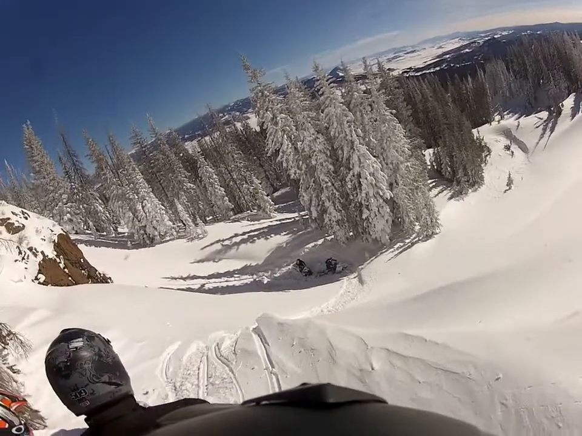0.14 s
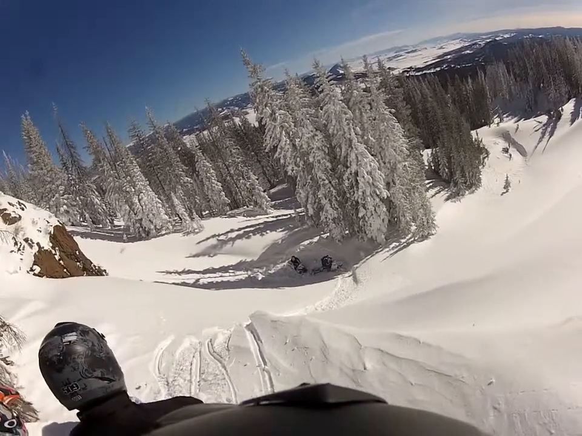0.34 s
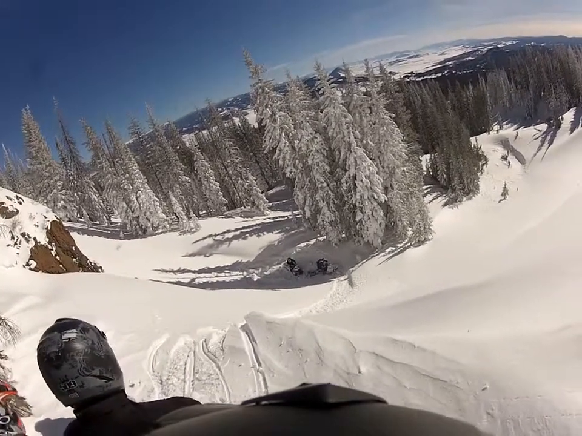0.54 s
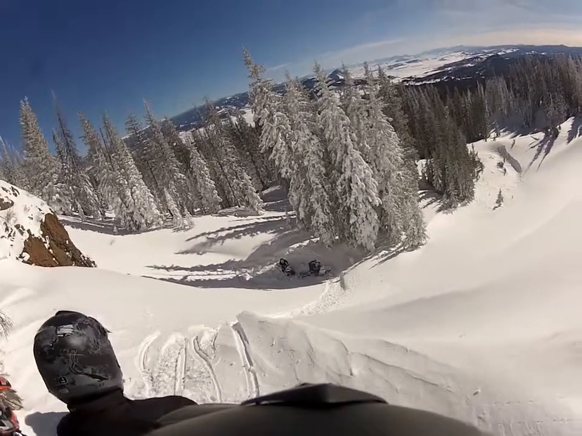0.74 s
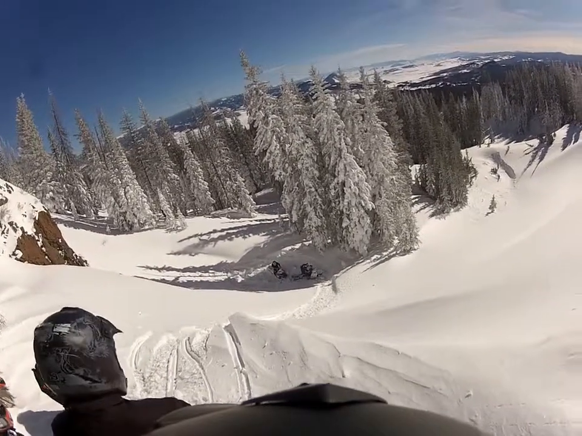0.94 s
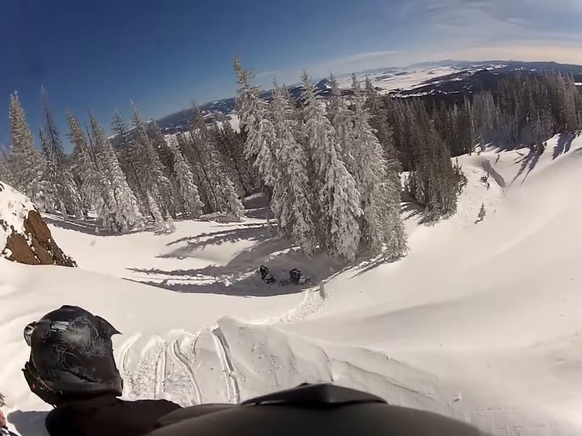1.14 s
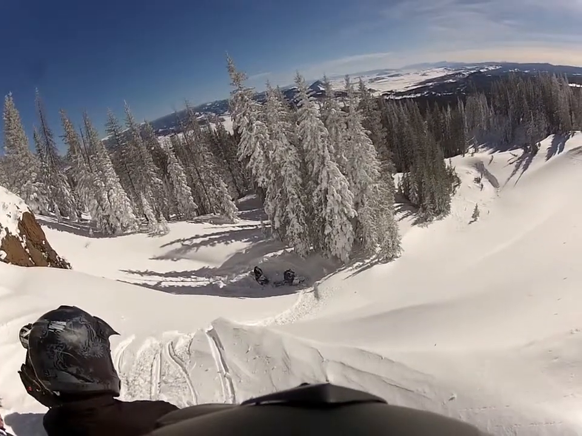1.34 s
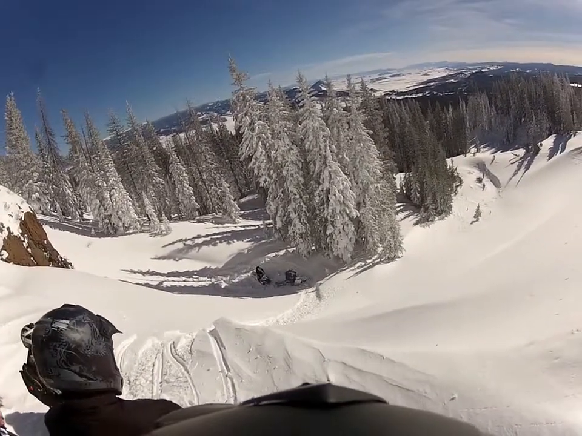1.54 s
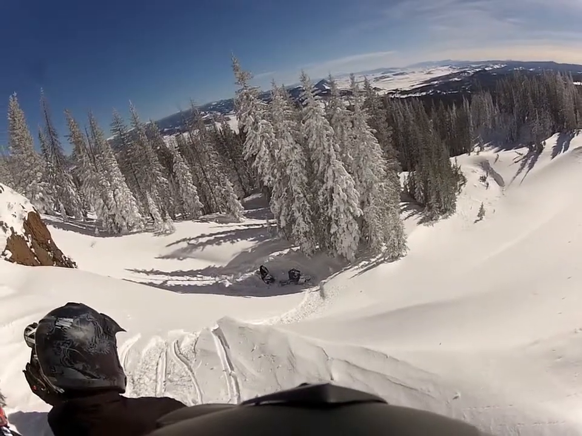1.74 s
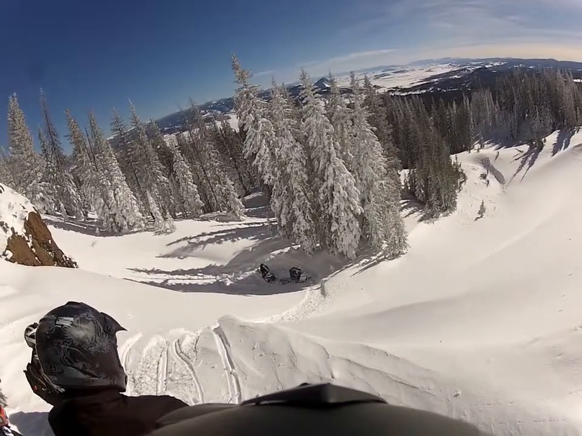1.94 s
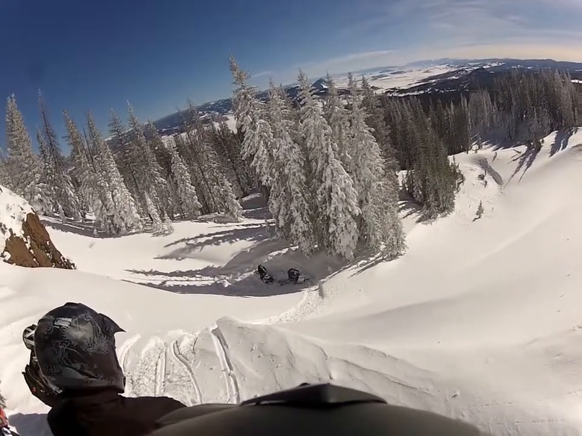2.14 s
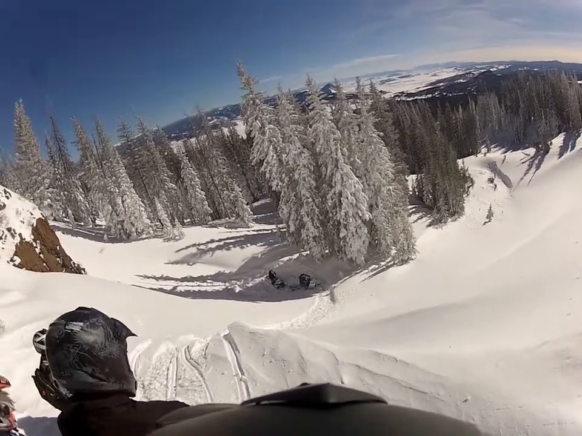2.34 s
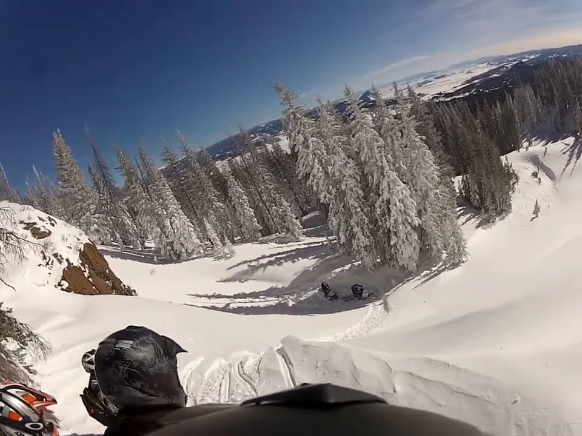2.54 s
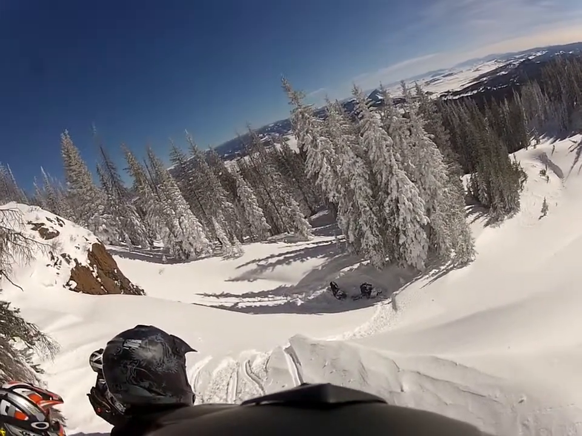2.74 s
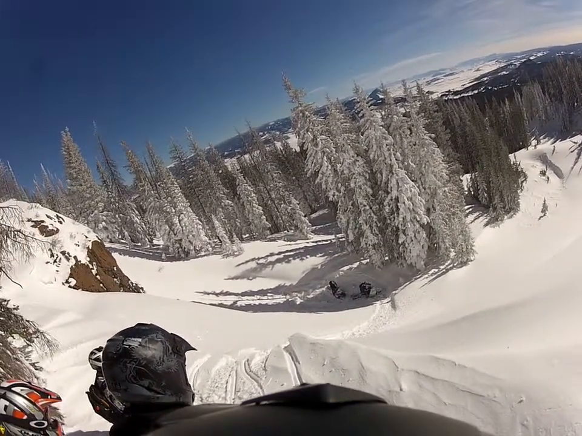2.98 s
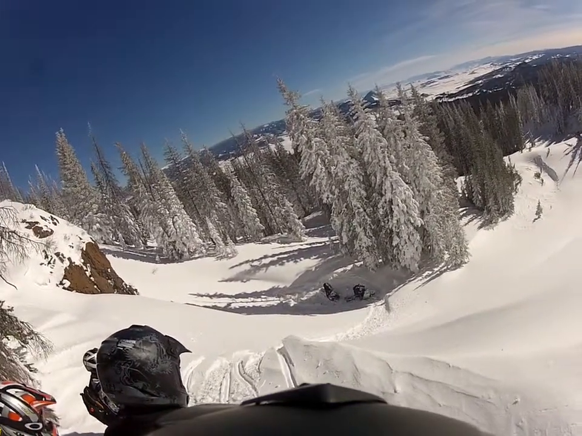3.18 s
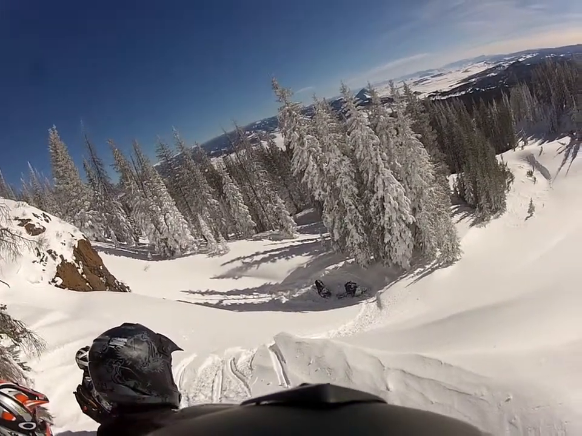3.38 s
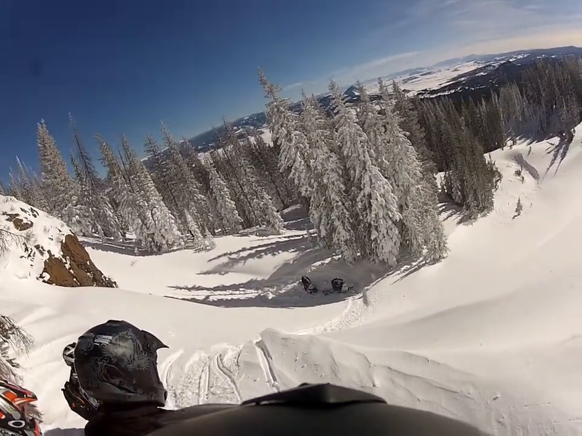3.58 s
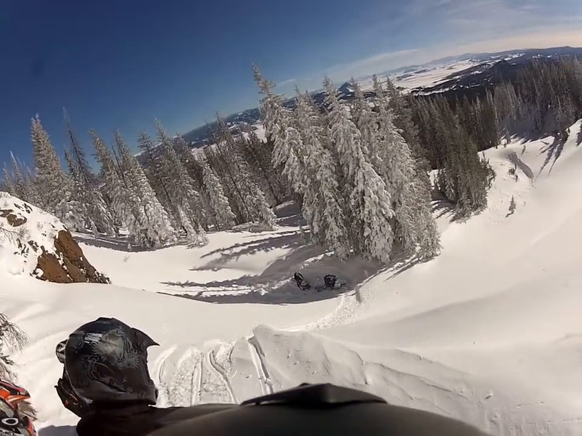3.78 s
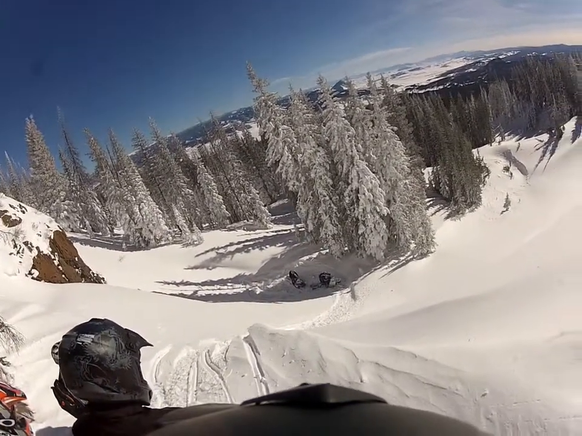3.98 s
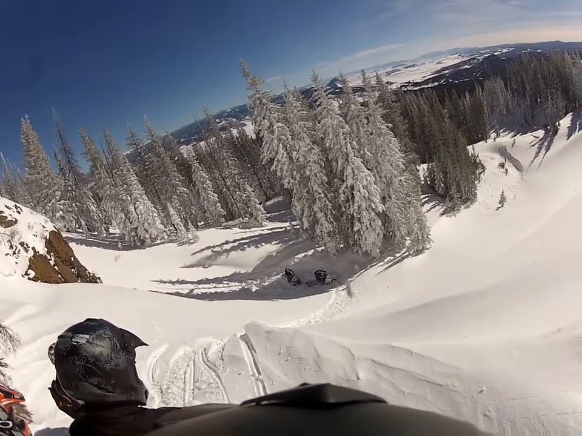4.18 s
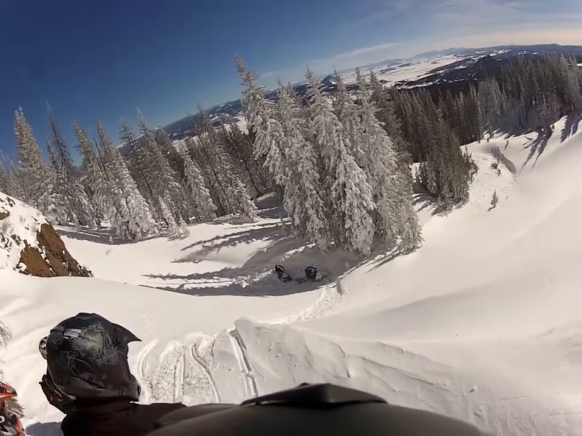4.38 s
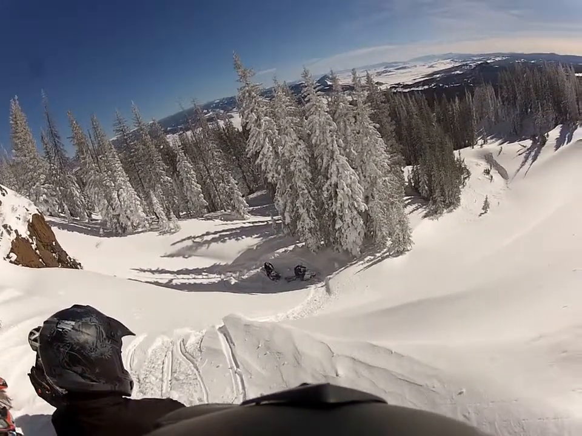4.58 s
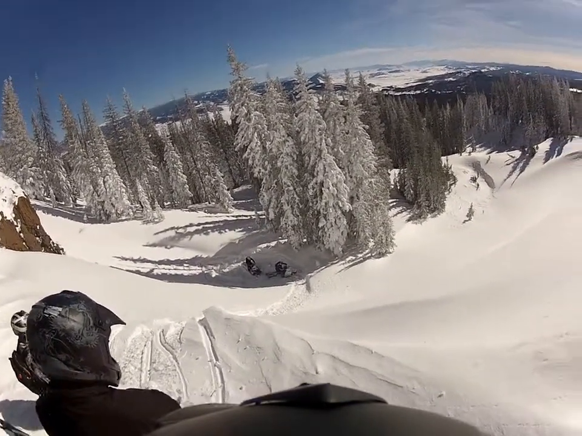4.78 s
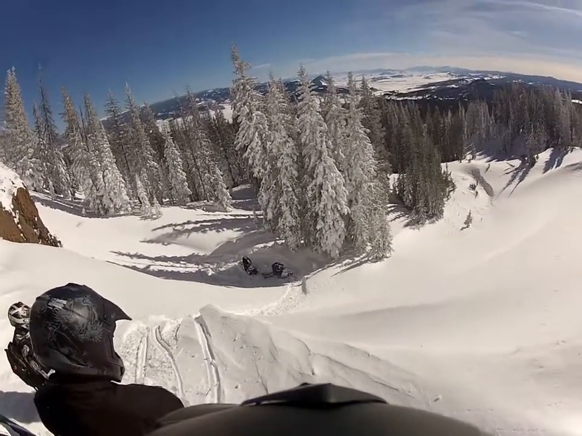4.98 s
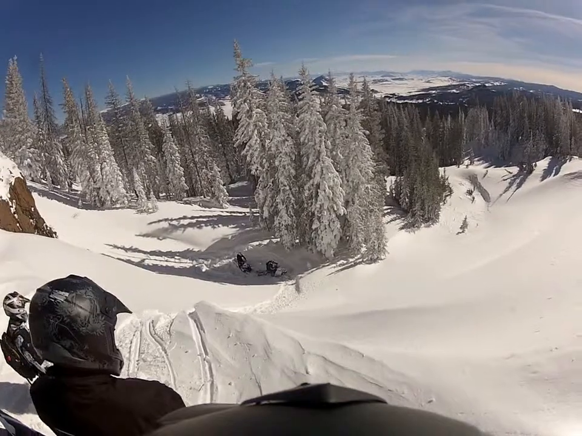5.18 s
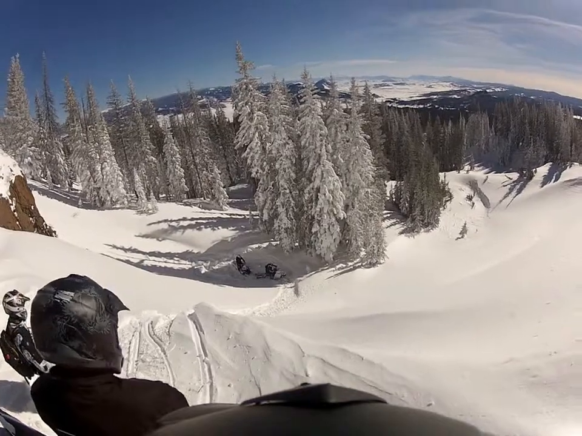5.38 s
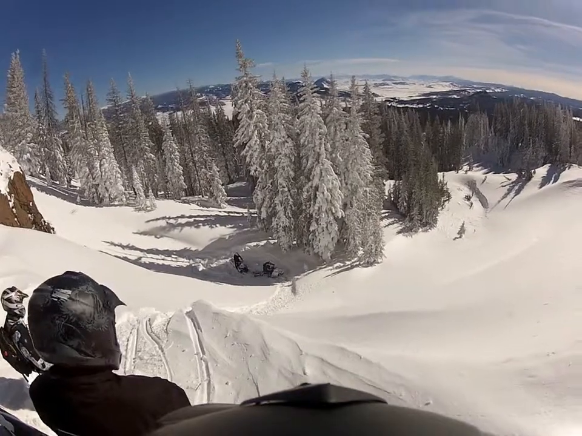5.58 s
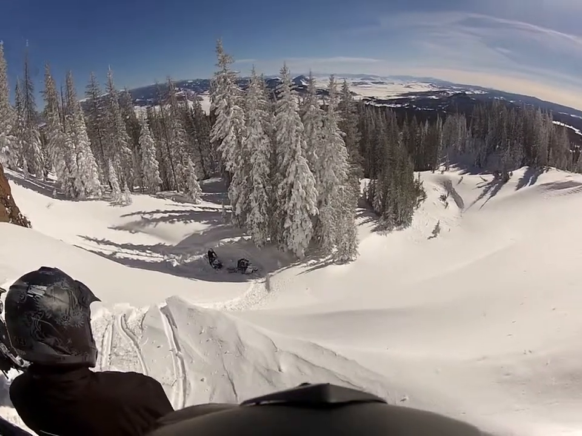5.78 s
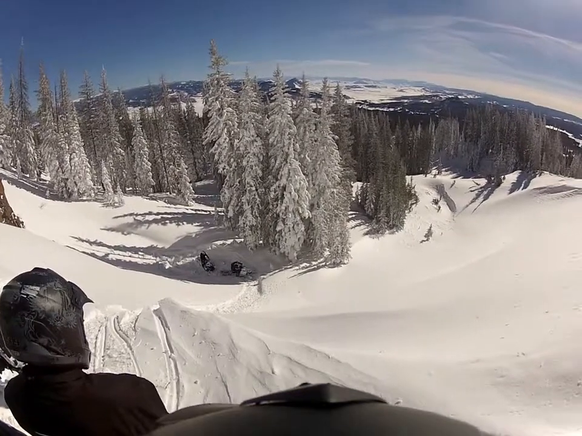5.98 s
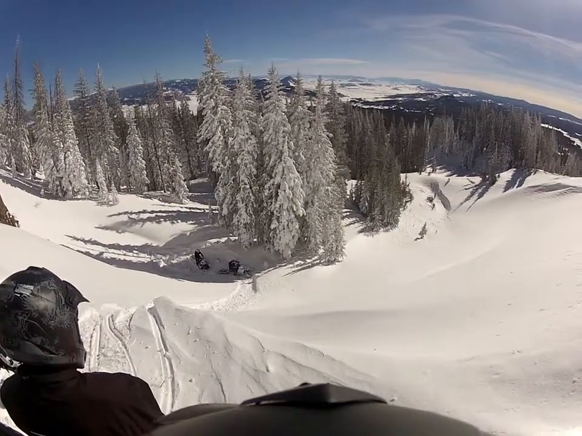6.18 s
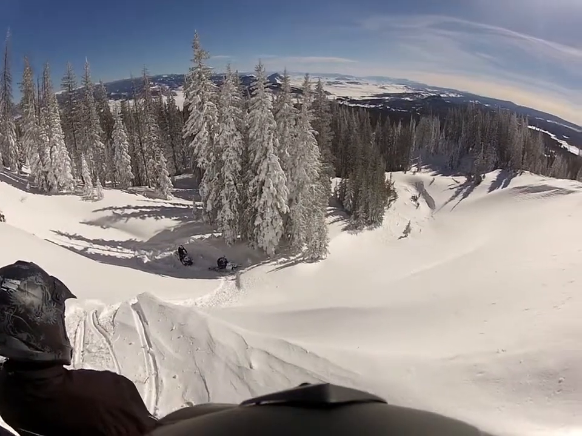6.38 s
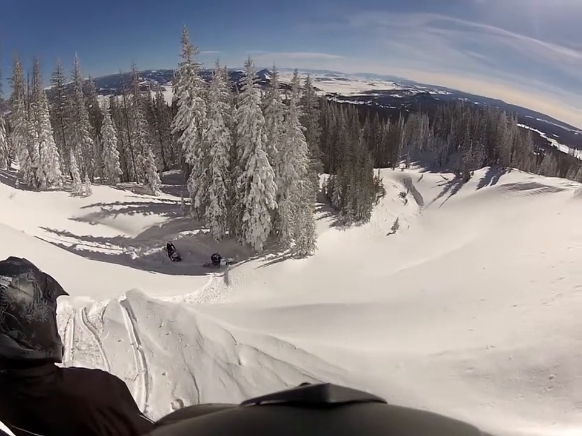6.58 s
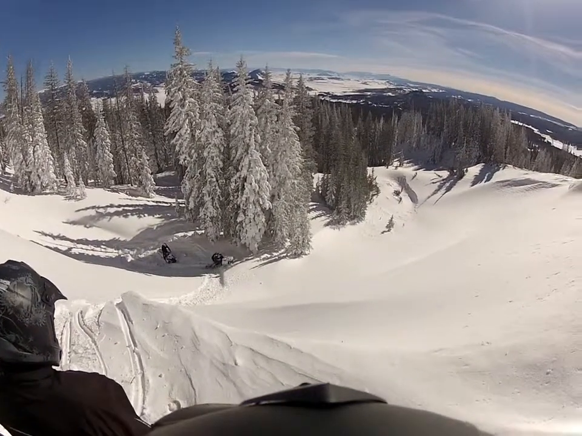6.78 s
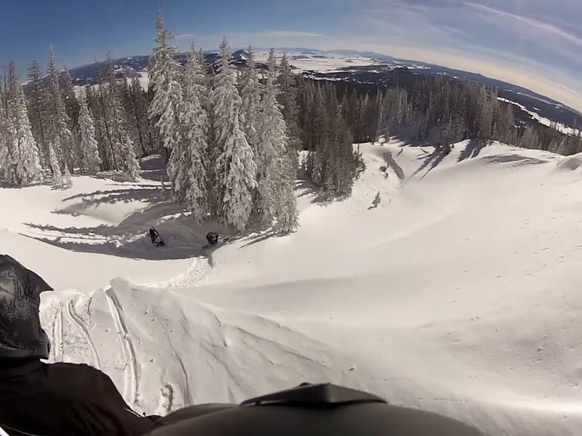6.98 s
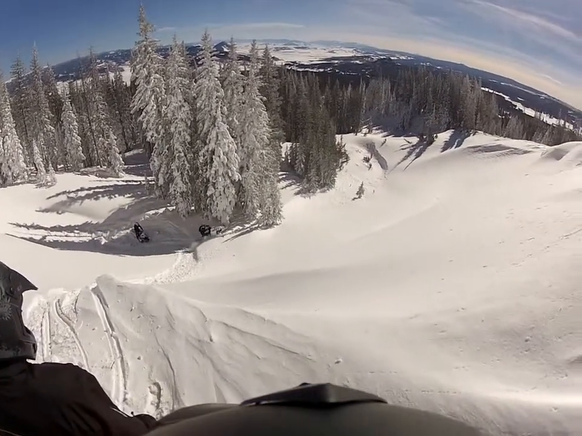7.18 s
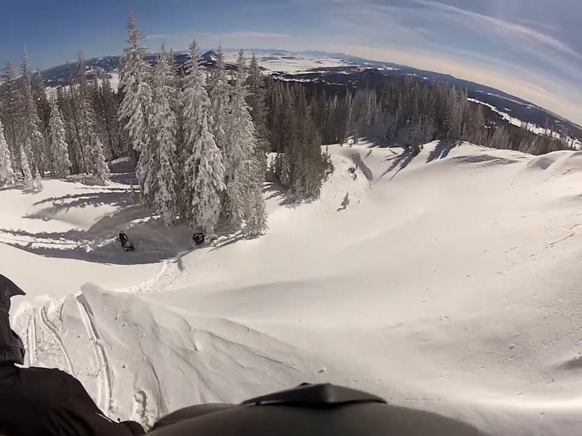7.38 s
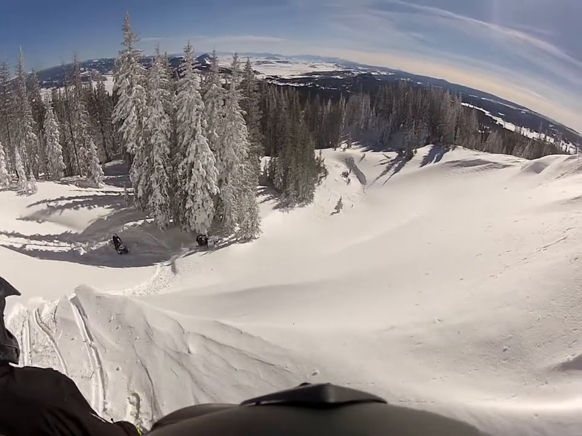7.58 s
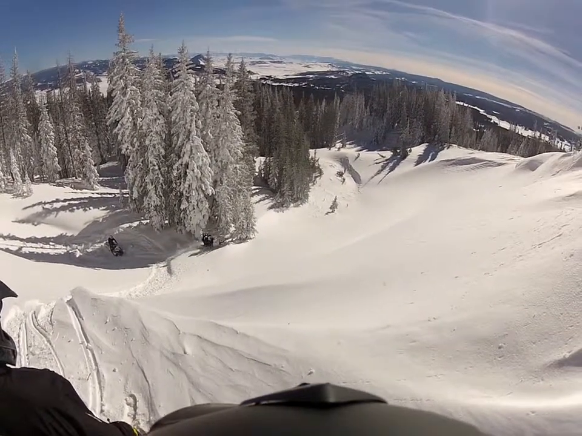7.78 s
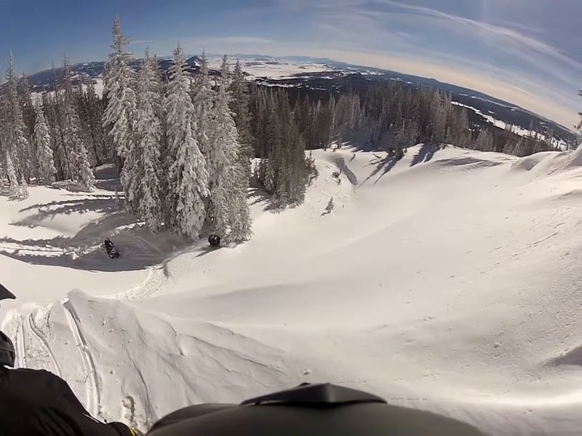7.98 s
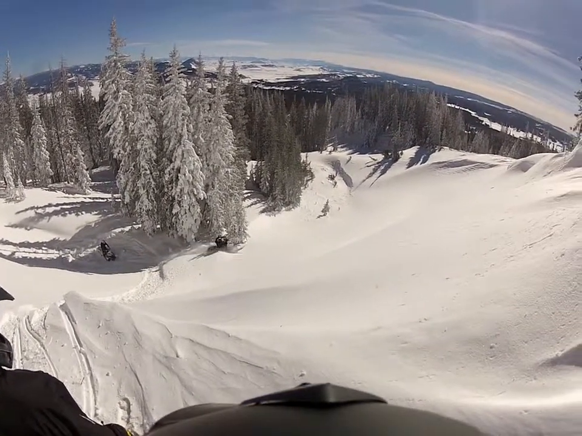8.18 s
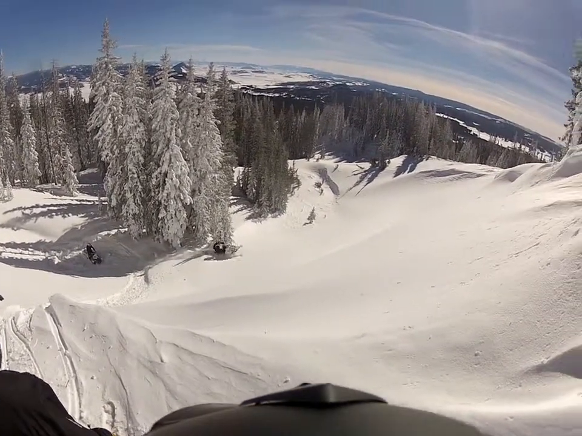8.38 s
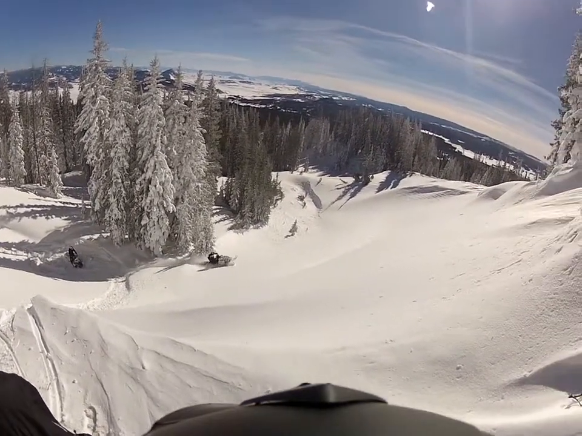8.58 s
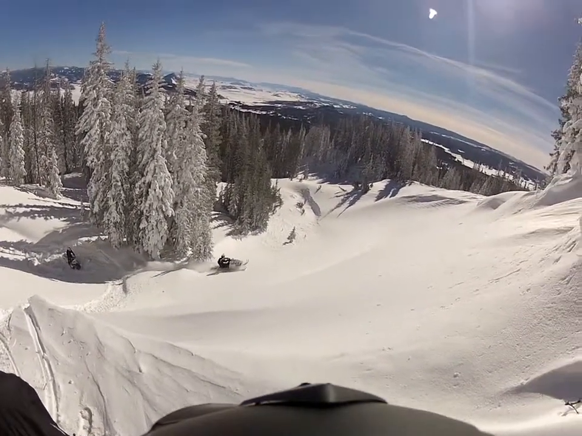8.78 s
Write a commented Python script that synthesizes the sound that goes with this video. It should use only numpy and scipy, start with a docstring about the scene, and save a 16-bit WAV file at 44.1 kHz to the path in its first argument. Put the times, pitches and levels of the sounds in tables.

```python
"""A two-cylinder two-stroke snowmobile far down a snowy slope, heard by an action camera shut in its case.
First a short blip of even firings, over a ragged idle, a low rumble of air and hiss that last throughout.
Then it sputters: bursts of cracks ring in pipe and case, with faint even puffs joining in later.
Last it climbs to full speed in throttle surges. Trees echo the engine (not the idle), and the case taps twice.
The case favours about 1-3 kHz; the recorder holds coarse samples, which mirrors the sound in the treble."""
import sys
import numpy as np
from scipy import signal
from scipy.fft import rfft, irfft, next_fast_len
from scipy.io import wavfile
from scipy.ndimage import uniform_filter1d

SR = 44100
rng = np.random.default_rng(int(sys.argv[2]) if len(sys.argv) > 2 else 0)


def log_audio(samples):
    """Write samples as a 16-bit WAV file to the path given in sys.argv[1]."""
    # one column per channel
    frames = np.atleast_2d(samples).T
    # limit to full scale, then quantise
    limited = np.clip(frames, -1, 1)
    pcm = np.round(limited * 32767).astype(np.int16)
    wavfile.write(sys.argv[1], SR, pcm)


N = 389403
T = np.arange(N) / SR  # time of every sample, s

# The short blip: time_s, firing_rate_hz, level_db (part around 1 kHz), brightness_db (above 1.4 kHz against it)
BLIP = [(0.1, 165, -99, 10), (0.126, 162.5, -58.5, -19), (0.16, 164.1, -62.5, 2),
        (0.454, 180.1, -57.5, -1.5), (0.58, 181.4, -61, -3.5), (0.634, 193.6, -58, 3),
        (0.706, 195, -52.5, -4.5), (0.784, 207.3, -49, -10), (0.87, 186, -85, 5), (1.17, 182.8, -72.5, -6)]
# Where the note is split into parts: edge_hz
BAND_EDGES_HZ = [850, 1400, 2100, 3200]
# Tone colour of the blip, screened by trees, before its parts are levelled: pitch_hz, gain_db
SCREENED_COLOUR = [(150, -11), (400, -9), (780, -26.5), (900, -3.5), (1040, 4), (1350, -53), (1570, -5),
                   (1750, -16), (1930, 7.5), (2200, -4), (2900, -14.5), (4000, -30), (5950, -27)]
STUMBLE_S, STUMBLE_LENGTH_S = .772, 0.0063  # the blip briefly dips to silence just before it ends

# Speed of the climb, sagging when the throttle shuts: time_s, firing_rate_hz
CLIMB_SPEED = [(5.8, 158.9), (5.83, 159.4), (5.95, 189), (6.02, 198.2), (6.32, 239.6), (6.55, 263.6),
               (6.82, 257.2), (7.03, 263.5), (7.45, 256.2), (7.78, 265.1), (8.16, 257.5), (8.58, 269.5),
               (8.72, 260.3)]
# Throttle surges of the climb: time_s, level_db (part around 1 kHz), brightness_db (above 1.4 kHz against it)
SURGES = [(5.8, -75, -7), (5.85, -54, -4), (6.04, -44.5, -6.5), (6.14, -41, 2), (6.24, -46, 1),
          (6.35, -37, 2), (6.46, -31, 0), (6.69, -38.5, 7.5), (6.74, -34, -8), (6.9, -39.5, 13.5),
          (7.04, -33.5, -1.5), (7.07, -40, -0.5), (7.3, -54, 1.5), (7.59, -30, 2.5), (7.77, -38, 0.5),
          (7.85, -53, 10.5), (7.88, -52.5, 8.5), (8.16, -62.5, -0.5), (8.26, -35, 5), (8.36, -34, 4),
          (8.44, -41, 10.5), (8.53, -38.5, 6), (8.62, -60, 13.5), (8.69, -65, 3), (8.81, -65, 7.5),
          (8.83, -70, 17)]
# What is added to the brightness in the middle, high and top parts of the climb: gain_db
BRIGHT_SHARES_DB = [-3, -3, -10]
# Tone colour of the exhaust through the case, before its parts are levelled: pitch_hz, gain_db
EXHAUST_COLOUR = [(150, -25), (270, -18.5), (520, -23), (700, -25.5), (880, -7.5), (1030, -2.5),
                  (1180, -15), (1310, -3), (1500, -10.5), (1800, -8), (2150, -2.5), (2400, 1), (2900, -7),
                  (3900, -27.5), (5200, -20), (5950, -39)]
# Bounces off the snow that briefly cancel part of the climb: time_s, length_s, centre_hz, depth (0-1)
SNOW_DIPS = [(6.045, 0.074, 1810, 0.76), (6.455, 0.063, 1940, 0.9), (6.554, 0.067, 2600, 0.91),
             (6.789, 0.11, 1640, 0.93), (7.15, 0.095, 2812, 0.42), (7.78, .05, 2600, 1),
             (7.641, .05, 2953, .7), (7.949, 0.14, 2990, 0.4), (8.35, .04, 2700, 0.82),
             (8.736, 0.095, 2500, 0.95)]
DIP_WIDTH_HZ = 500  # distance from a dip's centre to its edge
FULL_HZ = 265  # firing rate at full speed
TOP_DB_PER_HZ, TOP_LAG_S = 0.17, 0.037  # the top part grows with speed and trails the throttle

BASS_FOLLOW = 0.32  # share of the throttle swell, in dB, that reaches the bass
TWIN_DB = -.6  # one cylinder against the other
RASP_DB = -27  # gas noise against the firings
SHAFT_ORDER, SHAFT_DB = 2.5, -64  # faint tone at 2.5 times the firing rate: five times the crank speed
LATE_HZ, LATE_WIDTH_HZ = 1200, 900  # the pipe lets this part of each firing out late

# Clear sputter bursts: start_s, level_db (near the peak of the first firing), firings (count)
BURSTS = [(0.123, -52, 1), (0.782, -50, 2), (2.212, -54, 1), (2.249, -49.5, 1), (2.277, -53, 1),
          (2.931, -52, 1), (3.066, -54, 1), (3.132, -50.5, 1), (4.371, -52.5, 1), (4.454, -52, 1),
          (4.479, -47.5, 2), (4.553, -47.5, 1), (4.592, -47, 2), (4.688, -48, 3), (4.727, -46, 2),
          (4.797, -46, 5), (4.922, -41, 4), (5.038, -39, 4), (5.132, -42.5, 5), (5.214, -50, 1),
          (5.236, -40, 2), (5.317, -44, 3), (5.391, -49, 1), (5.411, -41, 1), (5.468, -50, 1),
          (5.571, -43, 1), (5.633, -44.5, 1), (5.71, -42.5, 1), (5.743, -48, 1), (5.807, -50, 3),
          (5.846, -40, 1)]
BURST_HZ = 125.8  # firing rate within a burst
# How a pop rings in pipe and case: pitch_hz, width_hz, relative_level_db
POP_MODES = [(1051, 43, 7.5), (1370, 66, -1), (1646, 89, 4.5), (1874, 87, 4.5), (2583, 187, 0),
             (3520, 300, -21.5), (4960, 150, -20.5)]
STRAY_SPAN_S, STRAY_COUNT = (1.9, 5.8), 26  # lone weak pops at random moments
STRAY_DB, STRAY_SCATTER_DB = -57, 2  # their lowest level, and how far above it they lie on average
# Faint even puffs between the bursts: time_s, firing_rate_hz, level_db
PUMPING = [(4.6, 126.7, -65.5), (5.031, 127.5, -68.5), (5.51, 142.7, -66), (5.729, 144.7, -81),
           (5.85, 166.2, -64)]

# Idle: time_s, level_db, upper_db (upper rings, changed against the lowest one)
IDLE = [(0.0, -48, 2), (0.07, -64, 0.5), (0.7, -61.5, 8.5), (1.12, -66.5, -7), (2.2, -64.5, -2.5),
        (2.36, -76, 2), (2.5, -65.5, 2.5), (3.3, -68, 1), (4.3, -66.5, 3.5), (5.3, -64.5, 1),
        (5.9, -58, 5.5)]
IDLE_HZ = 61.4  # average firing rate
# How the idle rings: pitch_hz, width_hz, relative_level_db
IDLE_MODES = [(1033, 255, 2), (1627, 180, 0.5), (1928, 150, 3), (2330, 730, -7)]

TREES_T60_S, TREES_DB = 0.7, -17  # time for the echo to fade by 60 dB, and its strength
# Taps of the case: time_s, level_db (of the tap before it rings)
TICKS = [(0.0498, -52), (2.3875, -59)]
# Colour of the microphone hiss, before it is set to its level: pitch_hz, gain_db
HISS_COLOUR = [(47, -51.5), (80, -11), (161, -4), (219, -5), (298, -6), (600, -15), (941, -17.5),
               (1350, -21), (2310, -21.5), (5900, -29), (7670, -67), (13000, -120)]
HISS_DB = -63.5
# Gusts of air on the case: time_s, swell_db
GUSTS = [(2.51, 11.5), (4.9, 5), (5.7, 7), (6.3, 5), (7.08, 11), (8.41, 7)]
AIR_DB, GUST_S = -67.5, 0.07  # level of the air rumble without gusts; time for a swell to fade to a third

HOLD_HZ, FINE_HZ = 12000, 48000  # rates of the coarse and the fine samples
TOP_HZ = 15300  # nothing much is recorded above this


def pulling():
    """The engine pulling: each firing pushes gas through the exhaust, first in a short blip, later in the climb."""
    hz, db, bright = columns(BLIP)
    blip = under_load(hz, db, [bright], SCREENED_COLOUR, BAND_EDGES_HZ[:2], -62.5)
    blip *= span(np.transpose(BLIP)[0])
    stumble = 1 - bump(STUMBLE_S, STUMBLE_LENGTH_S)

    (hz,), (db, bright) = columns(CLIMB_SPEED), columns(SURGES)
    middle, high, top = (bright + share for share in BRIGHT_SHARES_DB)
    late_top_db = np.interp(T - TOP_LAG_S, T, db + top)
    trailing = late_top_db - db + TOP_DB_PER_HZ * (hz - FULL_HZ)
    climb = under_load(hz, db, [middle, high, trailing], EXHAUST_COLOUR, BAND_EDGES_HZ, -54.5)
    return stumble * blip + cancel(climb) * span(np.transpose(SURGES)[0])


def under_load(hz, db, brightness_db, colour, edges_hz, bass_db):
    """Even firings with a rasp of gas; each part of the note follows the throttle, the bass least."""
    bangs = firings(hz, .004, .7, TWIN_DB)
    rasp = fade_out(bangs, 0.0011) * rng.standard_normal(N)
    rough = bangs + undb(RASP_DB) * rasp * rms(bangs) / rms(rasp)
    note = late_lows(shape(over_snow(rough, 0.13, 5), colour))

    size = next_fast_len(N)
    spectrum, f = rfft(note, size), np.fft.rfftfreq(size, 1 / SR)
    below = [1 / (1 + (f / edge) ** 12) for edge in edges_hz]  # lets through what lies below each edge
    swell_db = BASS_FOLLOW * (db - db.max()) + 20 * np.log10(hz / hz.max()) + 3.1 * walk(7)
    shaft = np.sin(2 * np.pi * SHAFT_ORDER * np.cumsum(hz) / SR)
    out = undb(SHAFT_DB + swell_db) * shaft * (hz / FULL_HZ) ** 6
    levels_db = [bass_db + swell_db, db, *(db + b for b in brightness_db)]
    for upper, lower, band_db in zip([*below, 1], [0, *below], levels_db):
        band = irfft(spectrum * (upper - lower), size)[:N]
        loudness = np.sqrt(uniform_filter1d(band ** 2, 2048) + 1e-12)
        out = out + undb(band_db) * band / loudness  # even out the part, then give it its level
    return out


def firings(hz, jitter, scatter_db, twin_db):
    """One impulse per firing, a little uneven in time and strength; the two cylinders take turns."""
    turns = np.cumsum(hz) / SR
    count = np.arange(1, int(turns[-1]))
    chance = rng.standard_normal((len(count), 2))
    times = np.interp(count + jitter * chance[:, 0], turns, T)
    return clicks(times, undb(scatter_db * chance[:, 1] + twin_db * (count % 2)))


def over_snow(x, drift_ms, drift_rate):
    """Bounces off drifts arrive late by times that wander, so each overtone swells and sinks alone."""
    paths = [(.6, -7), (1.9, -8), (4.1, -10)]  # average delay_ms, level_db
    out = x
    for delay_ms, db in paths:
        late_s = (delay_ms + drift_ms * walk(drift_rate)) / 1000
        out = out + undb(db) * np.interp(T - late_s, T, x)
    return out


def late_lows(x):
    """All-pass filter, run twice: it delays the lower part of each firing without changing its strength."""
    _, a = signal.iirpeak(LATE_HZ, LATE_HZ / LATE_WIDTH_HZ, fs=SR)
    once = signal.lfilter(a[::-1], a, x)
    return signal.lfilter(a[::-1], a, once)


def cancel(x):
    """Bounces off the snow cancel the sound: each dip takes a band out of it for a moment."""
    size = next_fast_len(N)
    spectrum, f = rfft(x, size), np.fft.rfftfreq(size, 1 / SR)
    out = x
    for s, length, hz, depth in SNOW_DIPS:
        band = irfft(spectrum * np.exp(-((f - hz) / DIP_WIDTH_HZ) ** 4), size)[:N]
        out = out - min(depth, 1) * bump(s, length) * band
    return out


def sputter():
    """Bursts of a few hard firings between misfires, each a crack plus a short puff of gas."""
    pop = ring(clicks([0.], 0.93), POP_MODES)
    hits = []
    for s, db, count in BURSTS:
        hits += [(s + k / BURST_HZ, db - .4 * k) for k in range(round(count))]  # each one a bit weaker

    stray = rng.random((STRAY_COUNT, 2))
    stray_s = np.interp(stray[:, 0], [0, 1], STRAY_SPAN_S)
    stray_db = STRAY_DB - STRAY_SCATTER_DB * np.log(1 - stray[:, 1])  # mostly weak, a few stronger
    hits += zip(stray_s, stray_db)

    times, db = np.transpose(hits)
    cracks = clicks(times, undb(db + 1.0 * rng.standard_normal(len(db))))
    puff = fade_out(cracks, .006) * rng.standard_normal(N)
    return ring(cracks + undb(-31) * puff, POP_MODES) / np.abs(pop).max()


def pumping():
    """Between the bursts the cylinders still pump faint even puffs, which ring in pipe and case."""
    s, hz, db = np.transpose(PUMPING)
    tone = ring(firings(np.interp(T, s, hz), 0.012, 1.2, 0), POP_MODES)
    return tone / rms(tone) * undb(np.interp(T, s, db)) * span(s)


def idle():
    """Weak, ragged firings blurred by distance and gas noise; each ring flickers on its own."""
    s, db, upper_db = np.transpose(IDLE)
    ragged = firings(np.full(N, IDLE_HZ), .2, 3, 0)
    puff = (0.066 + fade_out(ragged, 0.02)) * rng.standard_normal(N)  # a steady trace of noise plus the puffs
    gas = ragged + undb(-8.5) * puff
    rings = []
    for hz, width, mode_db in IDLE_MODES:
        once = ring(gas, [(hz, width, 0)])
        rings.append(ring(once, [(hz, width, mode_db)]))
    rings = [r * undb(2.5 * walk(14)) for r in rings]
    mutter = rings[0] + undb(np.interp(T, s, upper_db)) * sum(rings[1:])
    return mutter / rms(mutter) * undb(np.interp(T, s, db))


def trees(x):
    """Scattered echo of the forest edge: fading noise that smears the sound, starting 12 ms late."""
    t = T[:SR]
    tail = rng.standard_normal(SR) * undb(-60 * t / TREES_T60_S) * (t > .012)
    return undb(TREES_DB) * signal.fftconvolve(x, tail / np.sqrt(np.sum(tail ** 2)))[:N]


def ticks():
    """Short bright taps of the plastic case: fading noise through one broad ring."""
    s, db = np.transpose(TICKS)
    burst = fade_out(clicks(s, undb(db)), 0.0087) * rng.standard_normal(N)
    return ring(burst, [(4780, 1500, 5.2)])


def hiss():
    """Microphone self-noise, mostly bass, and low gusts of air on the case."""
    noise = shape(rng.standard_normal(N), HISS_COLOUR)
    low_band = signal.butter(2, [28, 85], "band", fs=SR, output="sos")
    air = signal.sosfilt(low_band, rng.standard_normal(N))
    swell_db = sum(db * bump(s, GUST_S) for s, db in GUSTS)
    air *= undb(AIR_DB + swell_db + 2 * walk(8)) / rms(air)
    return noise / rms(noise) * undb(HISS_DB) + air


def undb(db):
    """Turn decibels into a plain multiplier."""
    return 10 ** (np.asarray(db) / 20)


def rms(x):
    """Average strength of a sound."""
    return np.sqrt(np.mean(x ** 2))


def fade_out(x, seconds):
    """Each impulse starts a tail that fades to about a third in the given time."""
    return signal.lfilter([1], [1, -np.exp(-1 / (seconds * SR))], x)


def shape(x, points):
    """Filter with the gain of (Hz, dB) points that never reacts ahead of time, from the folded cepstrum."""
    size = 4096
    hz, db = np.transpose(points)
    grid_hz = np.arange(size // 2 + 1) * SR / size
    log_gain = np.log(undb(np.interp(np.log(grid_hz + 1), np.log(hz), db)))
    ceps = irfft(log_gain)
    ceps[1:size // 2] *= 2
    ceps[size // 2 + 1:] = 0
    return signal.fftconvolve(x, irfft(np.exp(rfft(ceps))))[:N]


def ring(x, modes):
    """Sum of two-pole resonances of alternating sign."""
    out = 0
    for k, (hz, width, db) in enumerate(modes):
        b, a = signal.iirpeak(hz, hz / width, fs=SR)
        out = out + (-1) ** k * undb(db) * signal.lfilter(b, a, x)
    return out


def clicks(times, sizes):
    """Impulses at exact times, each shared between two samples."""
    at = np.clip(np.asarray(times) * SR, 0, N - 2)
    i, out = at.astype(int), np.zeros(N)
    np.add.at(out, i, sizes * (1 - at + i))
    np.add.at(out, i + 1, sizes * (at - i))
    return out


def walk(rate):
    """Random levels held for 1 / rate s and smoothed twice; spread near 1."""
    k = int(SR / rate)
    steps = np.repeat(rng.standard_normal(N // k + 1), k)
    return 1.3 * uniform_filter1d(uniform_filter1d(steps, k), k)[:N]


def columns(table):
    """Each column of a table over time."""
    s, *rest = np.transpose(table)
    return [np.interp(T, s, c) for c in rest]


def span(s):
    """One while a table lasts, with short fades."""
    return np.interp(T, [s[0] - .03, s[0], s[-1], s[-1] + .05], [0, 1, 1, 0])


def bump(s, length):
    """Bell-shaped swell around a moment."""
    return np.exp(-((T - s) / length) ** 2)


def scene():
    """The engine with its echo, then idle, taps and background noise."""
    sled = pulling() + sputter() + pumping()
    return (sled + trees(sled) + idle() + ticks() + hiss())[None]


def record(dry):
    """Low-pass, take coarse samples, hold each one for four fine samples, cut the top."""
    narrow = signal.sosfilt(signal.butter(10, 0.46 * HOLD_HZ, fs=SR, output="sos"), dry)
    sampled = narrow * (1 + 2 * np.cos(2 * np.pi * HOLD_HZ * T))  # the signal and its first mirror pair
    size = next_fast_len(N)
    f = np.fft.rfftfreq(size, 1 / SR)
    hold_gain = np.sinc(f / HOLD_HZ) / np.sinc(f / FINE_HZ)
    held = irfft(rfft(sampled, size) * hold_gain, size)[:, :N]
    return signal.sosfilt(signal.ellip(10, .2, 80, TOP_HZ, fs=SR, output="sos"), held)


dry = scene()
out = record(dry)
log_audio(out)
```